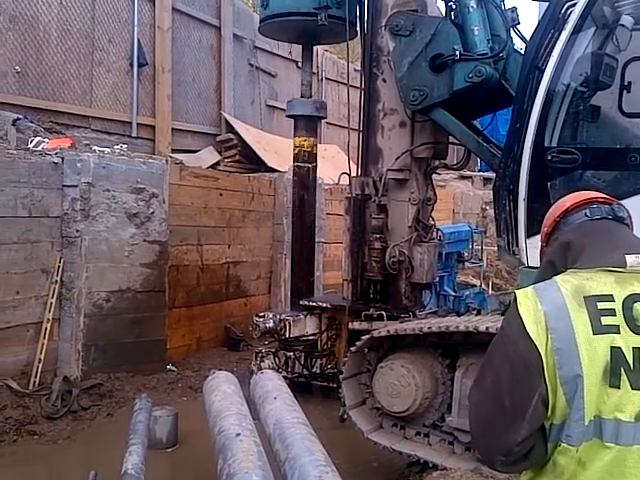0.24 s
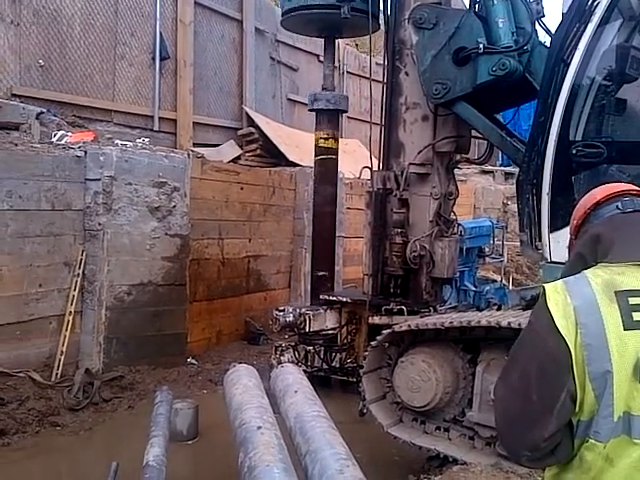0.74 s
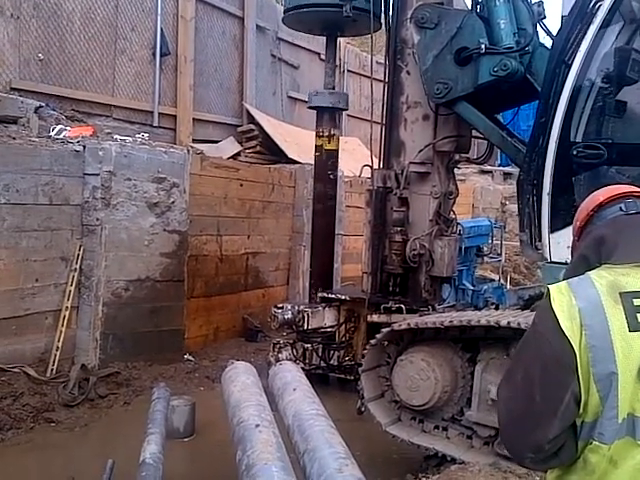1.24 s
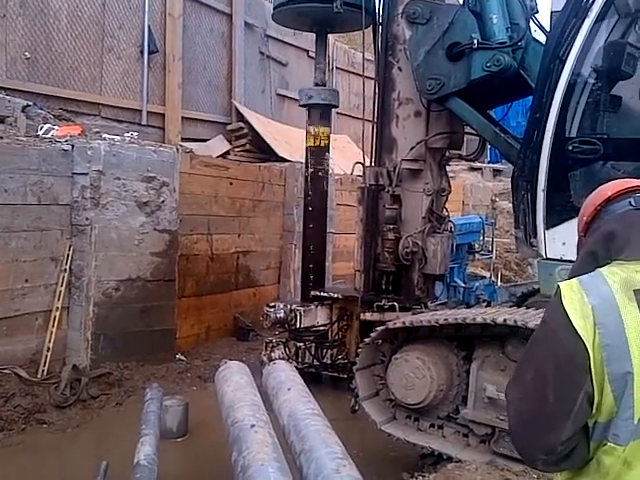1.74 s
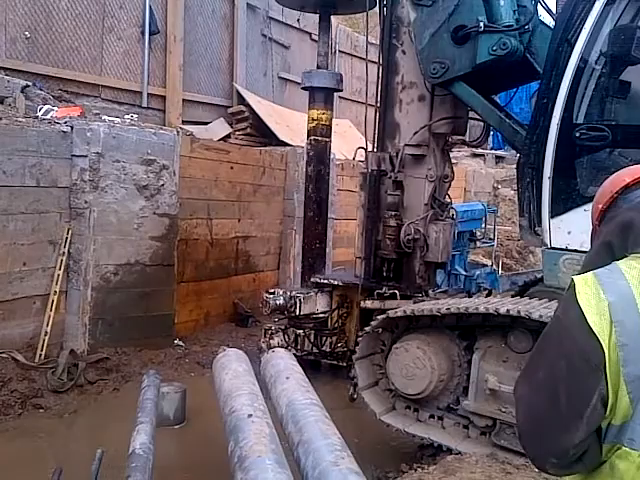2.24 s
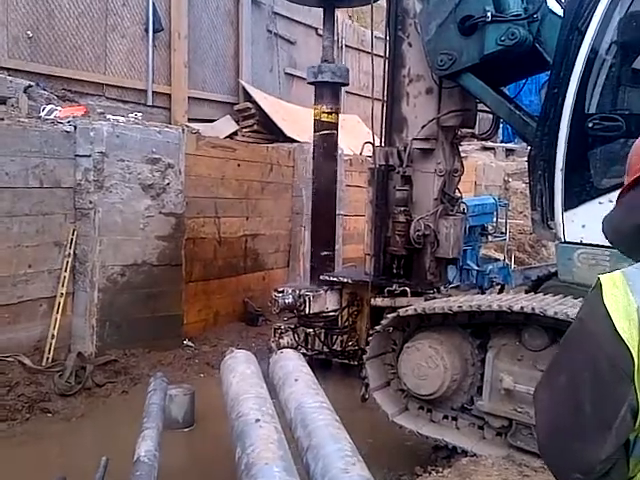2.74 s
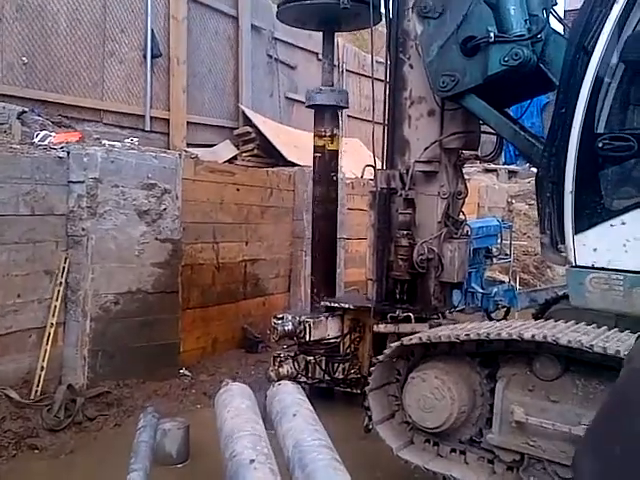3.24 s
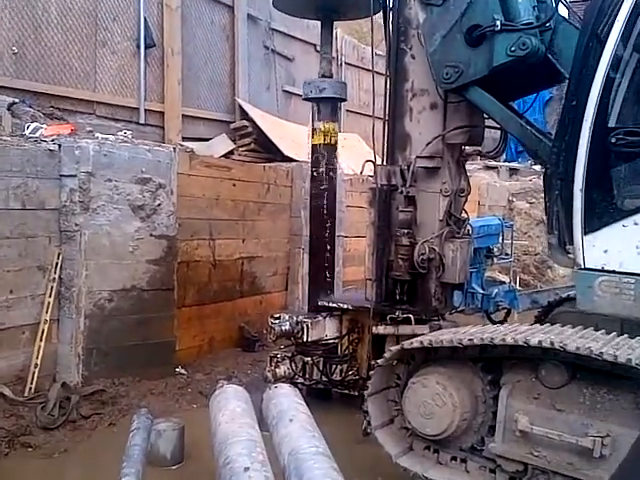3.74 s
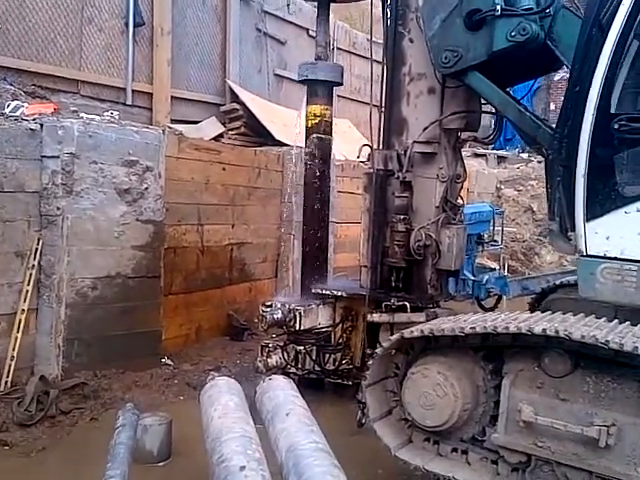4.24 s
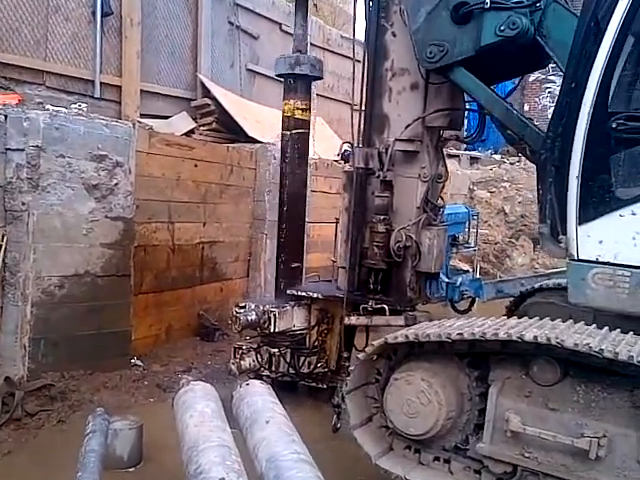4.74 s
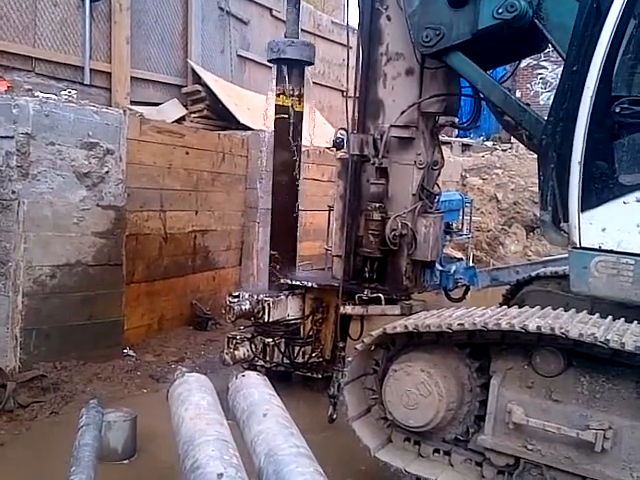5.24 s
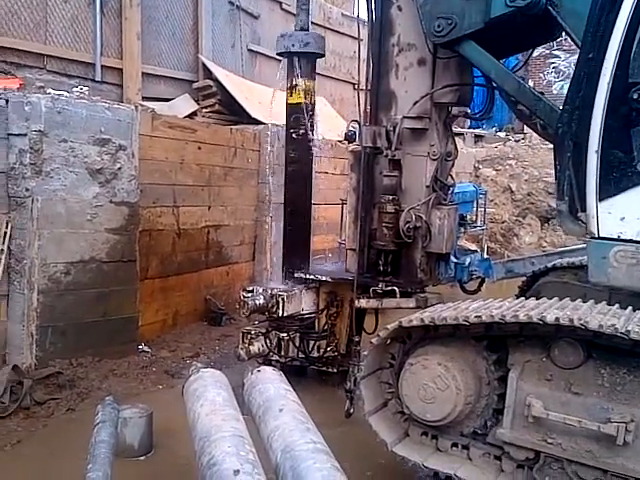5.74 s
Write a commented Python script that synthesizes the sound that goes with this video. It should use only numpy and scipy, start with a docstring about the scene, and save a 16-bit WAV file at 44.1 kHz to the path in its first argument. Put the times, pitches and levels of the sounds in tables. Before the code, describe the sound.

Loud, distorted diesel drone from a rock drill, with rapid pounding, metallic ringing, irregular clanks and a hiss of air.

```python
"""The diesel engine of a rock-drilling rig drones close by, its exhaust boom growing louder.
Its fan and hydraulics hum along, while a hammer pounds a steel rod into a boulder:
the rod rings and clanks, the bit grinds, and compressed air hisses out of the hole.
The din overloads the microphone into a nearly square wave, which adds new tones
(sums and differences of the rig's own) and a harsh rasp."""
import sys
import numpy as np
from scipy import signal
from scipy.io import wavfile

SR = 44100
rng = np.random.default_rng(int(sys.argv[2]) if len(sys.argv) > 2 else 0)


def master_out(mix):
    """Clip the mix to full scale and print it as 16-bit PCM to the path in sys.argv[1]."""
    frames = np.transpose(np.atleast_2d(mix))
    ceiling = np.clip(frames, -1, 1)
    pcm = np.round(ceiling * 32767).astype(np.int16)
    wavfile.write(sys.argv[1], SR, pcm)


N = 263718
TIME = np.arange(N) / SR
FIRING_HZ = 93.9   # engine firings per second at normal speed
LOAD_CYCLE_S, FIRST_EASE_S = 2.08, 1.27   # the load on the bit slowly rises and eases


# How loud the exhaust booms over time: time_s, level_db
EXHAUST_BOOM = [(0.0, -6.5), (2.75, -4), (3.2, -1.4), (4.2, -0.2), (5.2, 3), (5.98, 3.5)]
# How the machinery's rumble is spread from low to high: pitch_hz, relative_level_db
RUMBLE_SPECTRUM = [(20, 4.5), (35, -26), (60, 3), (130, -0.5), (220, 0), (320, -2), (415, -1), (490, -4.5),
                   (650, -6.5), (900, -18)]

def diesel(engine_s, fan_hz=273.6):
    """The exhaust booms at the firing rate and an octave up; fan blades hum and machinery rumbles."""
    firings = FIRING_HZ * engine_s
    boom = tone(firings, curve(EXHAUST_BOOM))
    octave = tone(2 * firings, -4.5 + 0.76 * drift(4.8))
    fan = tone(fan_hz * engine_s, -2.5 + 0.8 * drift(8.0))
    rumble = from_db(-3.5) * noise(RUMBLE_SPECTRUM, flicker_db=3.5)
    return boom + octave + fan + rumble


def engine_clock(sag_hz=0.2, run_up_hz=0.38):
    """Seconds as the engine counts them: it slows just before the load eases, then briefly speeds up."""
    firing_hz = FIRING_HZ + run_up_hz * easing() - sag_hz * easing(lead_s=0.35)
    return np.cumsum(firing_hz / FIRING_HZ) / SR


# Jolts as the bit bites into the rock: peak_s, level_db, half_length_s
BITES = [(0.16, -12, 0.04), (0.76, -12.5, 0.06), (1.224, -19, 0.023), (1.52, -15, 0.03),
         (1.96, -10.5, 0.03), (2.61, -11.5, 0.052), (3.093, -9, 0.022), (3.587, -10.5, 0.022),
         (3.705, -10, 0.013), (4.065, -12, 0.02), (4.39, -10, 0.062), (5.005, -10.5, 0.014),
         (5.411, -5, 0.0069), (5.518, -16, 0.014)]
# Steel grinding on rock: pitch_hz, relative_level_db
GRIND_SPECTRUM = [(300, -5.5), (600, -1), (900, 3), (1400, -2), (2000, -6.5), (2800, -13), (4000, -26),
                  (6500, -35)]
# The rod rattling: pitch_hz, relative_level_db
CLANK_SPECTRUM = [(600, 9), (1000, -3), (1500, 5.5), (2000, -5.5), (2600, -11)]

def hammer_drill(hammer_hz=42.7, shake_fade_s=0.013):
    """Each hammer blow thuds and shakes the grinding bit; the rod clanks whenever the bit bites."""
    blows = hammer_hz * TIME + 0.038 * drift(1.0)
    since_blow_s = blows % 1 / hammer_hz
    shake = unit_power(1 + 0.29 * np.exp(-since_blow_s / shake_fade_s))
    grind_db = -10.5 + 0.15 * load() + 0.44 * drift(4.1)
    grind = from_db(grind_db) * noise(GRIND_SPECTRUM, flicker_db=1.0)
    clank = swells(BITES) * noise(CLANK_SPECTRUM, flicker_db=0.5)
    thud = tone(blows, -9.5 + 1.8 * drift(4.0))
    return thud + shake * (grind + clank)


# The rod's ringing tones, lowest first: start_level_db, load_swing_db, trend_db_per_s, bite_gain
ROD_TONES = [(-15, 3.5, 0.0, 0.12), (-24.5, -2.5, 0.57, 0.35), (-21.8, 2.6, -0.93, 0.15),
             (-31.5, 0, -0.5, 0.02), (-37, -6, 0.0, 0)]

def ringing_rod(lowest_hz=502.1, waver_db=1.6):
    """The hammered rod rings along its length in evenly spaced tones; uneven blows make them shimmer."""
    pressure, bite, out = load(), swells(BITES), 0
    for k, (start_db, swing_db, trend_db_per_s, bite_gain) in enumerate(ROD_TONES):
        level_db = start_db + swing_db * pressure + trend_db_per_s * TIME + waver_db * drift(2.5)
        gain = from_db(level_db) + bite_gain * bite
        cycles = (k + 1) * lowest_hz * TIME + 0.011 * drift(5.8)
        shimmer = min(0.12 + 0.15 * k, 0.45)   # higher tones shimmer more
        ring = tone(cycles) * (1 + shimmer * drift(25))
        flutter = shimmer * drift(25) * tone(cycles + 1 / 4)   # a quarter cycle ahead: jitters the pitch
        out = out + gain * (ring + flutter)
    return from_db(1.0) * out


def hydraulics(engine_s, pitch_hz=437.8):
    """The hydraulic drive hums at a pitch geared to the engine."""
    cycles = pitch_hz * engine_s + 0.054 * drift(0.71)
    return tone(cycles, -17 + 3.9 * drift(3.3))


# The hiss of escaping air: pitch_hz, relative_level_db
AIR_SPECTRUM = [(4000, 4.5), (6000, 3.5), (9000, -0.5), (11500, -5), (16000, -21)]
# The air's very high sizzle: pitch_hz, relative_level_db
SIZZLE_SPECTRUM = [(10000, -12), (14000, -1), (16000, 0)]
# Sharp spurts of air: peak_s, level_db, half_length_s
AIR_SPURTS = [(1.53, -35, 0.035), (2.9, -43, 0.037), (5.03, -33, 0.045), (5.3, -42, 0.038),
              (5.7, -43, 0.11)]

def flushing_air():
    """Compressed air hisses out of the hole, sizzles more before the load eases, and spits in spurts."""
    sizzle_db = -37.5 - 2 * load(lead_s=0.59) + 1.2 * drift(8.0)
    hiss = from_db(-31.5 + 1.8 * drift(8.4)) * noise(AIR_SPECTRUM, flicker_db=1.0)
    sizzle_gain = from_db(sizzle_db) + swells(AIR_SPURTS)
    return hiss + sizzle_gain * noise(SIZZLE_SPECTRUM, flicker_db=2.0)


# A faint background hiss: pitch_hz, relative_level_db
THIN_HISS_SPECTRUM = [(2200, 10.5), (3500, 0), (5000, -0.5), (8000, -4.5), (12000, -10), (16000, -28)]

def thin_hiss():
    """A thin, nearly steady hiss lies over the din."""
    return from_db(-41) * noise(THIN_HISS_SPECTRUM, flicker_db=1.5)


def load(lead_s=0):
    """Load on the bit, from -1 as it eases to 1 half a cycle later."""
    return -np.cos(2 * np.pi * (TIME + lead_s - FIRST_EASE_S) / LOAD_CYCLE_S)


def easing(lead_s=0, half_length_s=0.12):
    """A short bump of height 1, lead_s before each time the load eases."""
    sharpness = (LOAD_CYCLE_S / (2 * np.pi * half_length_s)) ** 2
    return np.exp(-sharpness * (1 + load(lead_s)))


def swells(events):
    """A smooth, bell-shaped rise and fall of gain for each event."""
    return sum(from_db(level_db) * np.exp(-0.5 * ((TIME - peak_s) / half_length_s) ** 2)
               for peak_s, level_db, half_length_s in events)


def tone(cycles, level_db=0):
    """A pure tone that follows a running count of cycles."""
    return np.sqrt(2) * from_db(level_db) * np.sin(2 * np.pi * cycles)


def noise(spectrum, flicker_db):
    """Noise of power 1, made of bands a third of an octave wide that each flicker on their own."""
    pitch_hz, level_db = np.transpose(spectrum)
    edges_hz = 20 * 2 ** (np.arange(30) / 3)
    white, out = rng.standard_normal((2, N)), 0
    for k, (low, high) in enumerate(zip(edges_hz, edges_hz[1:])):
        log_middle = np.log(low * high) / 2
        band_db = np.interp(log_middle, np.log(pitch_hz), level_db, left=-np.inf, right=-np.inf)
        wobble_db = flicker_db * drift(16.9)
        if np.isfinite(band_db):
            band_pass = signal.butter(2, [low, high], "band", fs=SR, output="sos")
            out = out + signal.sosfilt(band_pass, white[k % 2]) * from_db(band_db + wobble_db)
    return unit_power(out)


def drift(rate_hz):
    """A smooth random wander, about 1 in size; a higher rate wanders faster."""
    step, warm_up = 40, 2000   # samples per random value; values dropped while the filter settles
    memory = np.exp(-2 * np.pi * rate_hz * step / SR)
    white = rng.standard_normal(N // step + warm_up + 2)
    slow = signal.lfilter([1], [1, -2 * memory, memory ** 2], white)[warm_up:]
    return np.interp(np.arange(N) / step, np.arange(len(slow)), unit_power(slow))


def curve(points):
    """Join (time_s, value) points with straight lines."""
    return np.interp(TIME, *np.transpose(points))


def from_db(db):
    """Turn decibels into a gain to multiply by."""
    return 10 ** (np.asarray(db) / 20)


def unit_power(x):
    """Scale a signal to an average power of 1."""
    return x / np.sqrt(np.mean(x ** 2) + 1e-20)


def scene():
    """The whole rig; the noise from the hole grows a little along with the exhaust boom."""
    engine_s, boom_db = engine_clock(), curve(EXHAUST_BOOM)
    hole_gain = from_db(0.16 * (boom_db - boom_db.mean()))
    hole = hole_gain * (hammer_drill() + flushing_air())
    return (diesel(engine_s) + hydraulics(engine_s) + ringing_rod() + hole)[None]


def record(dry, limit=0.64, headroom=0.083, softness=0.95, dull_hz=2800, dull_share=0.28, top_hz=15500):
    """The overloaded microphone flattens the peaks; their edges are rounded and a thin hiss lies on top."""
    flattened = dry / (1 + np.abs(dry / limit) ** 8) ** (1 / 8)
    clipped = flattened + headroom * np.tanh((dry - flattened) / softness)   # a little gets past the limit
    rounded = signal.sosfiltfilt(signal.butter(2, dull_hz, fs=SR, output="sos"), clipped)
    mix = clipped + dull_share * (rounded - clipped) + thin_hiss()
    treble_cut = signal.ellip(10, 0.05, 60, top_hz, fs=SR, output="sos")
    return signal.sosfiltfilt(treble_cut, mix)


dry = scene()
out = record(dry)
master_out(out)
```